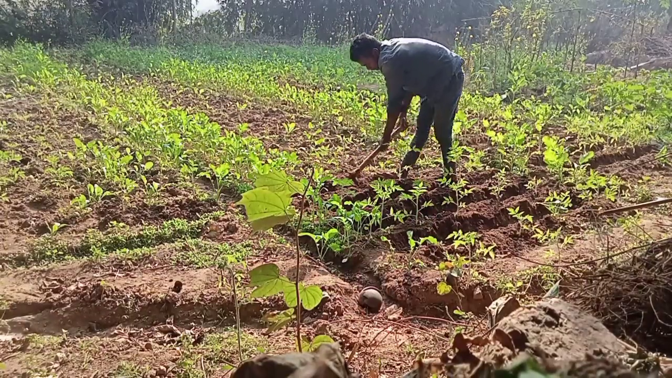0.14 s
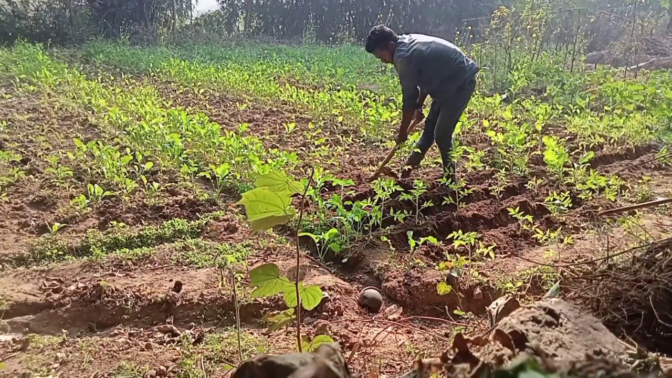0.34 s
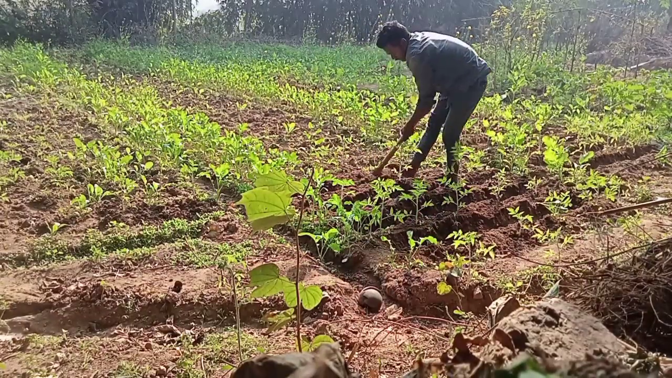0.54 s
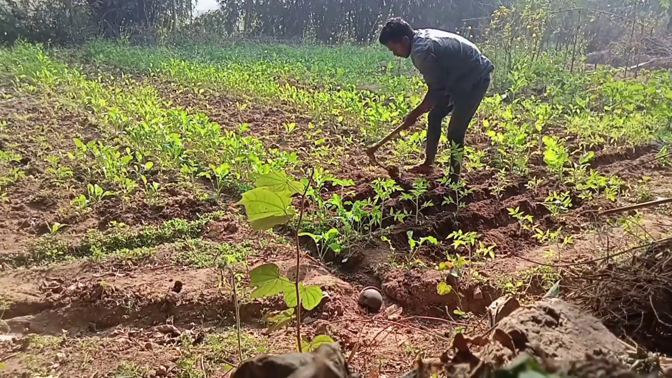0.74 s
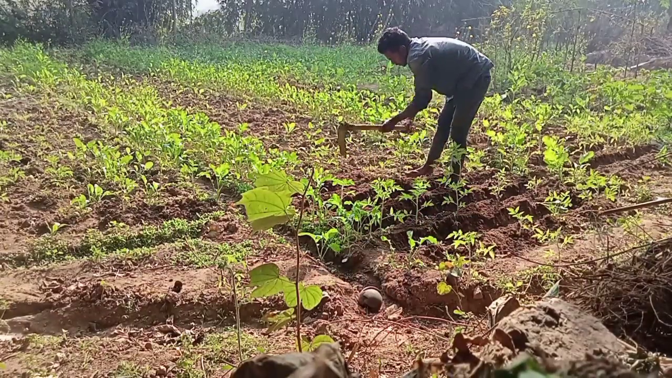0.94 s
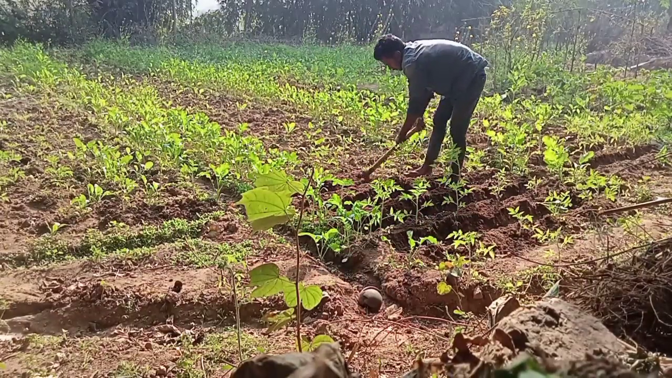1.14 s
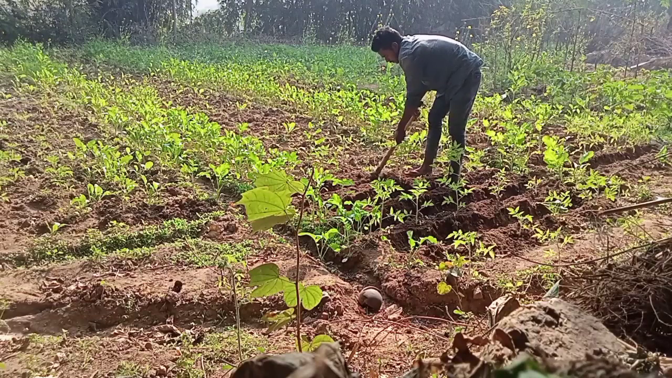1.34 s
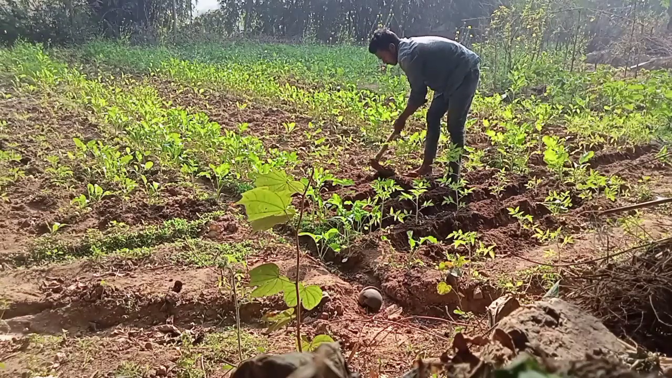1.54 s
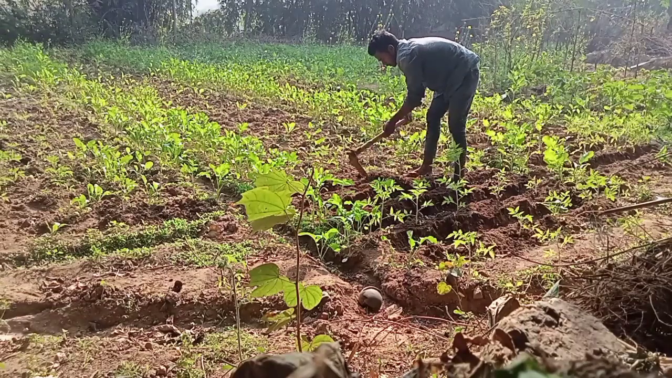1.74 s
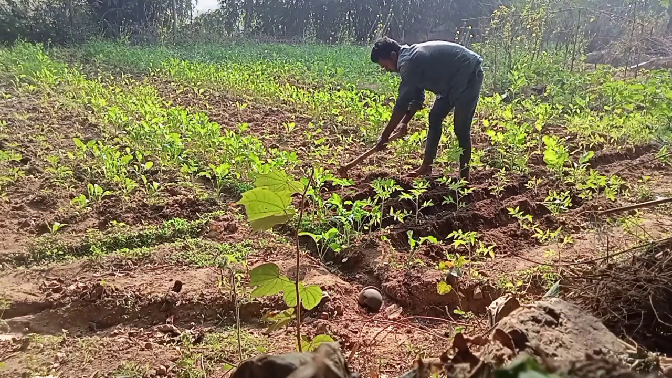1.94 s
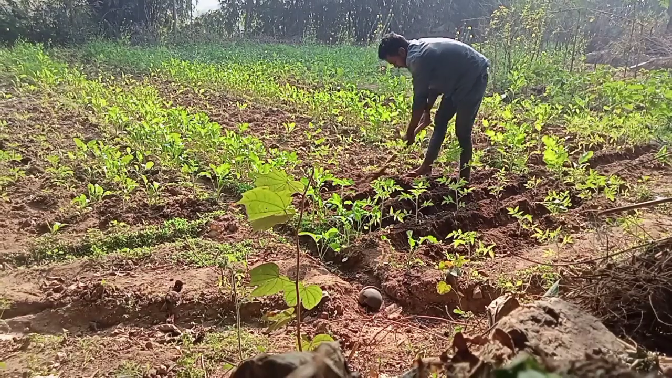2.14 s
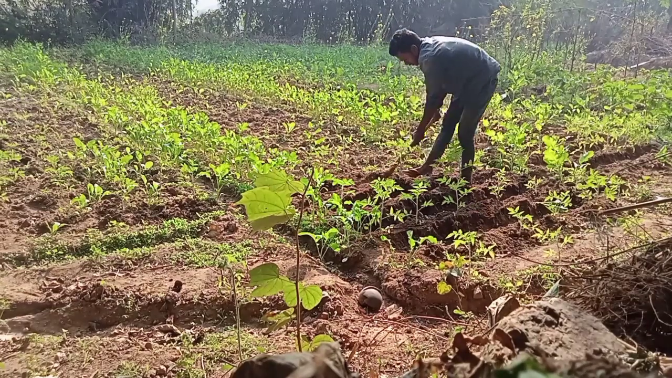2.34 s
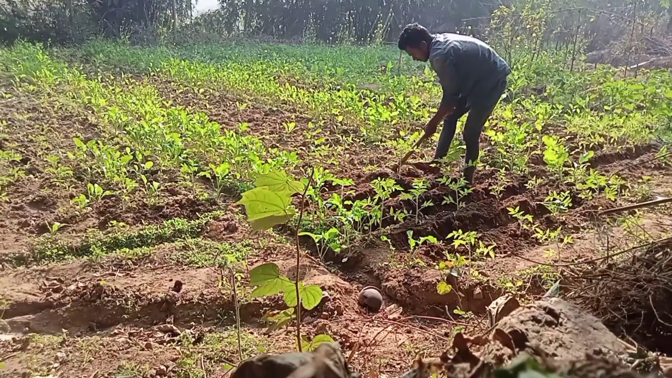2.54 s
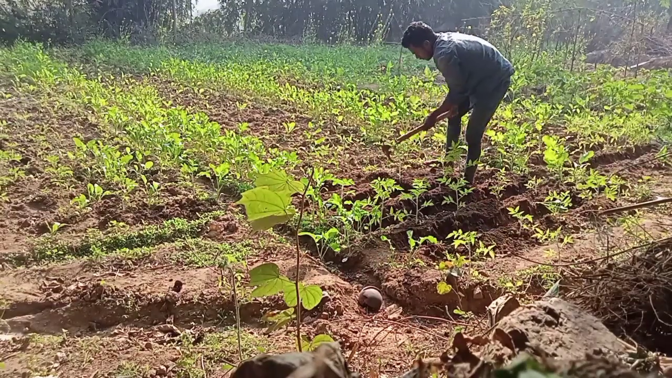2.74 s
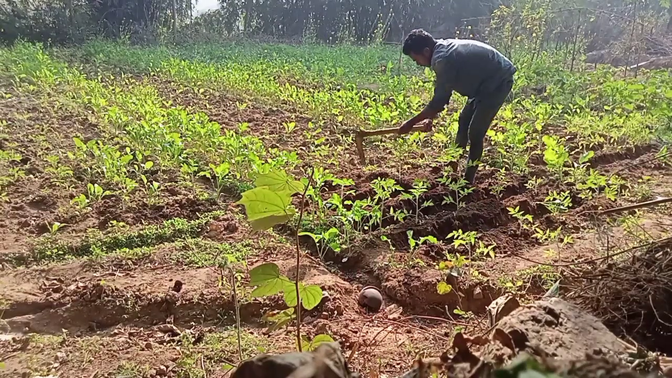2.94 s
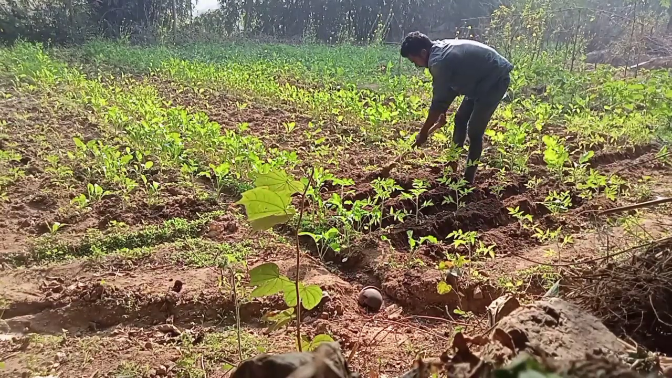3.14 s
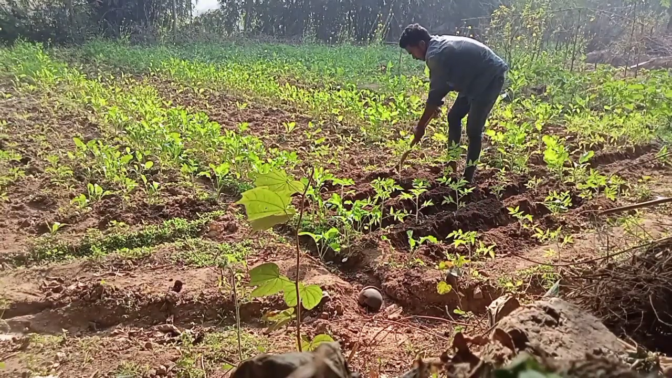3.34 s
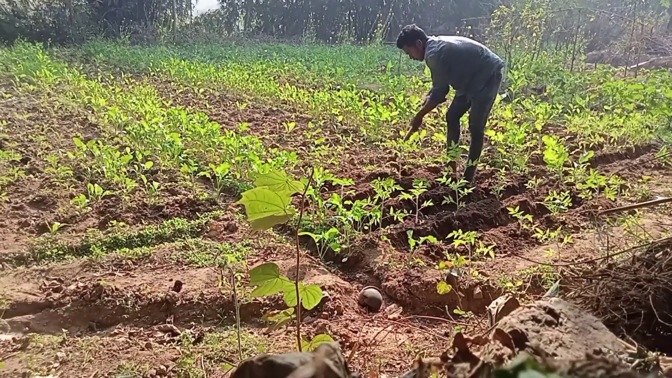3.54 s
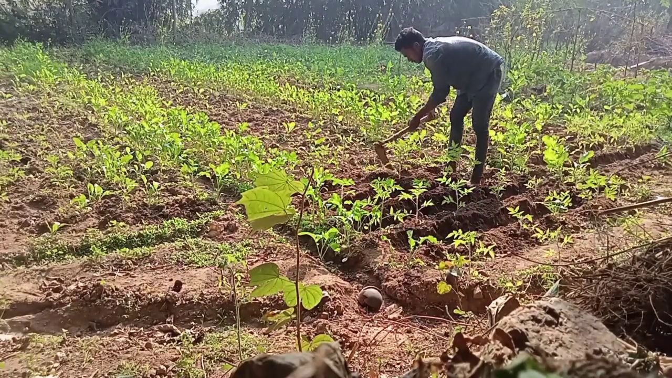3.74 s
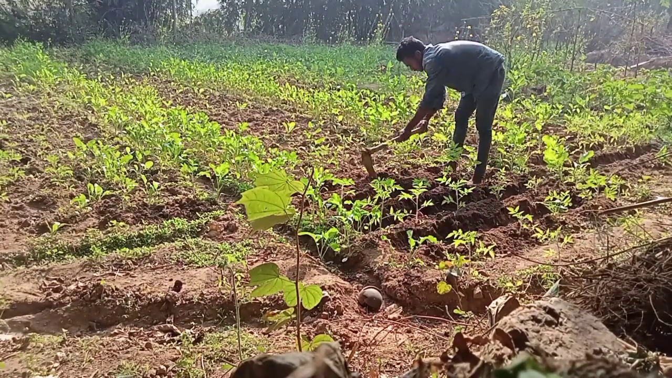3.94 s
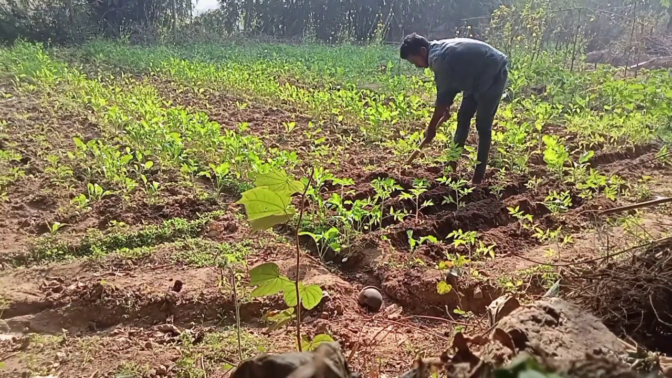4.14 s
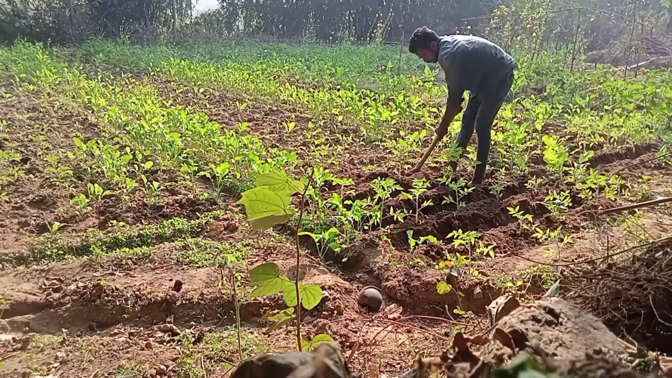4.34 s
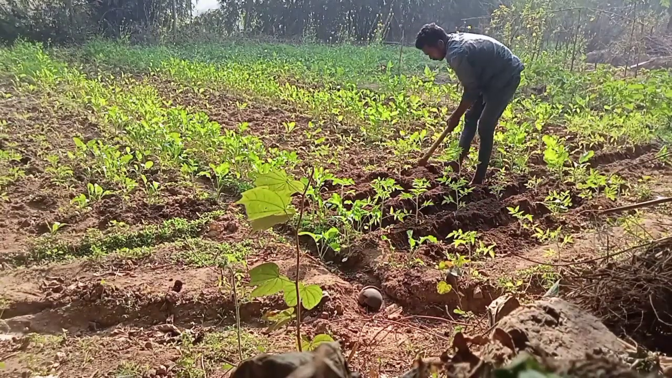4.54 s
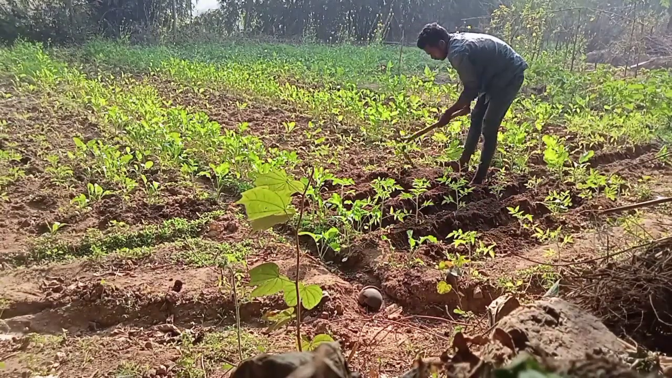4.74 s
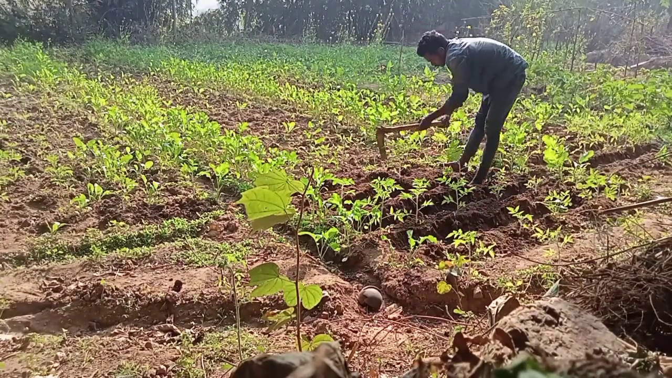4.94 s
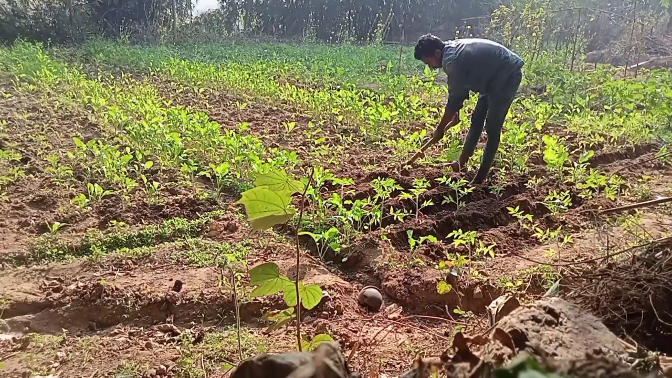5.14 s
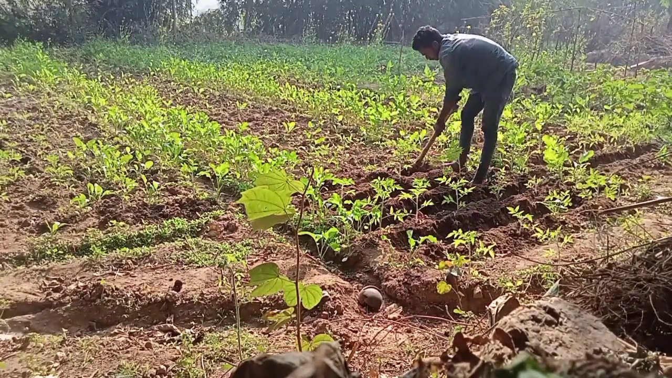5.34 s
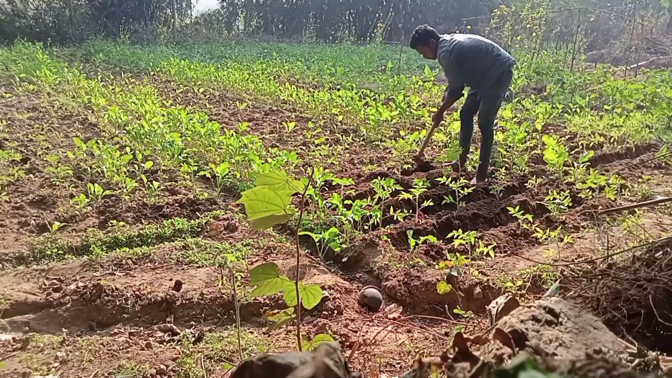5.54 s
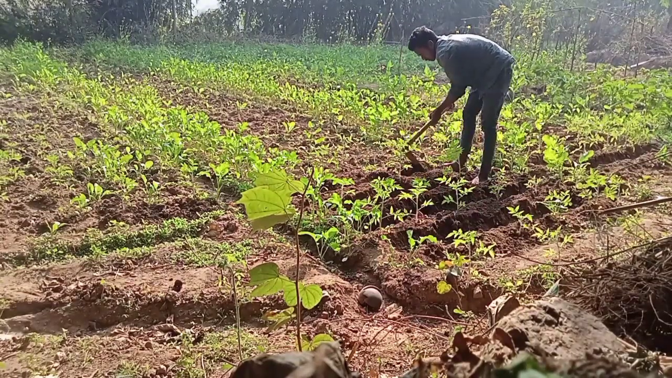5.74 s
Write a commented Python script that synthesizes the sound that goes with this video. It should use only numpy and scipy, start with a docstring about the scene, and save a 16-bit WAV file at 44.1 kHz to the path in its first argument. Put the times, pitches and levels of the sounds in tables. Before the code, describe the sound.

Six dull, gritty hoe strokes and crumbling earth in an open field, over distant bird whistles and soft cricket chirps.

```python
"""Hoeing a dry vegetable plot.

A short hoe chops the soil six times, a few metres from the microphone. Each bite thuds in the ground
while grit scratches and rings the steel blade; then earth crumbles off it. Crickets chirp farther off
and birds whistle in the trees round the field, over leaf hiss and a quiet distant rumble.
Near the end come three soft plips close by and a faint far hum."""
import sys
import numpy as np
from scipy import signal
from scipy.fft import rfft, irfft, next_fast_len
from scipy.io import wavfile
from scipy.ndimage import uniform_filter1d, map_coordinates

SR = 44100
rng = np.random.default_rng(int(sys.argv[2]) if len(sys.argv) > 2 else 0)


def wav_record(signal):
    """Record a signal, one row per channel, as 16-bit PCM in the file named by sys.argv[1]."""
    frames = np.transpose(np.atleast_2d(signal))
    bounded = np.clip(frames, -1, 1)
    # unit amplitude maps onto the largest positive 16-bit level
    quanta = np.round(bounded * 32767).astype(np.int16)
    wavfile.write(sys.argv[1], SR, quanta)


N = 259749

# hoe strokes: (deepest bite [s], plunge from touch to bite [s], rise [s], thud [dB], ground [Hz],
# knock [Hz], grit [dB], favoured blade ring [Hz], spilling earth [dB], spill t60 [s])
STROKES = [(.065, .02, 0.0025, -34, 149, 310.7, -50, 2600, -53.5, 0.81),
           (1.193, 0.023, 0.0095, -29, 169.2, 263.8, -39.5, 2650, -43.5, 0.37),
           (2.074, 0.03, 0.0019, -41, 148, 319, -46.5, 3270, -60, 0.41),
           (3.181, 0.034, 0.0072, -31.5, 125, 259.5, -41, 2400, -48.5, 0.44),
           (4.141, .044, 0.0026, -35.5, 137, 271, -39, 2550, -46.5, 0.64),
           (5.181, .011, .0062, -33, 127.3, 359, -37.5, 1720, -45.5, 0.47)]
LEAD_S = .05  # room for a contact force to build before its peak


def amp(db):
    """Decibels to gain."""
    return 10 ** (np.asarray(db) / 20)


def unit(x):
    """Scale to rms 1."""
    return x / np.sqrt(np.mean(x ** 2) + 1e-20)


def steady(x, window):
    """Hold the rms at 1 over runs of window samples."""
    return x / np.sqrt(np.abs(uniform_filter1d(x ** 2, size=window)) + 1e-12)


def along(points, hz):
    """Read (Hz, value) points on a log axis."""
    knots, values = np.transpose(points)
    return np.interp(np.log(hz + 1), np.log(knots + 1), values)


def filtered(x, response):
    """Shape x by a response given as a function of frequency."""
    size = next_fast_len(len(x) + SR // 4)
    return irfft(rfft(x, size) * response(np.fft.rfftfreq(size, 1 / SR)), size)[:len(x)]


def resonance(hz, centre, width):
    """Causal response of one mode."""
    return 1j * hz * width / (centre ** 2 - hz ** 2 + 1j * hz * width)


def wobble(size, rate):
    """A smooth random curve, rate knots a second."""
    knots = rng.standard_normal(int(size * rate / SR) + 4)
    return map_coordinates(knots, [np.arange(size) * rate / SR])


def add(track, s, x):
    """Mix x into track from time s on."""
    start = round(s * SR)
    x = x[max(-start, 0):]
    part = track[max(start, 0):][:len(x)]
    part += x[:len(part)]


def outdoors(air_db=-69.5, rumble_db=-65, hum_hz=650):
    """All round the microphone: leaf hiss, a restless distant rumble and a far hum that swells late."""
    # leaf hiss spectrum: (frequency [Hz], relative density [dB])
    air_spectrum = [(180, -40), (300, -4.5), (543, 2), (600, 2), (892, -0.5), (1350, -2), (1670, -2.5),
                    (1840, -1), (2210, -2), (3400, -6), (5050, -4.5), (5480, -17.5), (7750, -5),
                    (9760, -32.5), (15500, -25.5)]
    # distant rumble spectrum: (frequency [Hz], relative density [dB])
    rumble_spectrum = [(12, -54), (20, -21), (27, -14), (38, -40.5), (56, -4.5), (102, 0), (151, -7),
                       (182, -10.5), (312, -17), (500, -24.5), (650, -34), (1100, -120)]
    # swell of the far hum: (time [s], level [dB])
    hum_levels = [(0, -89), (4.9, -85), (5.2, -69), (5.55, -72), (5.65, -80), (5.8, -68), (5.89, -69)]
    noise = lambda response: unit(filtered(rng.standard_normal(N), response))
    air = amp(air_db + 2.8 * wobble(N, 2.81)) * noise(lambda hz: amp(along(air_spectrum, hz)))
    rumble = amp(rumble_db + .56 * wobble(N, 5.3)) * noise(lambda hz: amp(along(rumble_spectrum, hz)))
    swell = amp(np.interp(np.arange(N) / SR, *np.transpose(hum_levels)))
    hum = swell * noise(lambda hz: resonance(hz, hum_hz, width=150) ** 2)
    return air + rumble + hum


def grit(envelope, ring_hz, tilt_db_oct, ring_db=1, focus_db=8, spiky_db=4, soft_hz=8500):
    """Grains crack at random sizes; they sound by themselves and ring the blade."""
    # modes of the steel blade: (frequency [Hz], width [Hz], relative level [dB])
    blade_modes = [(1006, 86, -3), (1663, 72, 1), (1866, 187, 1), (2470, 200, -4), (2613, 65, 3),
                   (2960, 190, -12), (3530, 133, 0.5), (3750, 63, 2.5), (4080, 92, -8), (4920, 170, -8.5),
                   (5370, 40, -1), (7150, 280, -6.5)]
    # crushed soil spectrum: (frequency [Hz], relative density [dB])
    soil_spectrum = [(200, 1), (450, -21), (750, 9.5), (1300, 6.5), (2500, 13), (4000, 4), (5200, -7),
                     (6200, -1), (8300, 4), (9800, -8), (12500, -12), (15300, -7.5)]
    size = len(envelope)
    cracks = rng.standard_normal(size) * amp(spiky_db * wobble(size, 2500))

    def response(hz):
        modes = 0
        for centre, width, db in blade_modes:
            # the point of contact favours the modes near ring_hz
            favour_db = focus_db * np.exp(-(np.log(centre / ring_hz) / .22) ** 2) + rng.normal()
            modes += amp(db + favour_db) * resonance(hz, centre, width)
        steel = unit(modes / (1 + (hz / soft_hz) ** 10))  # the blade's ring fades steeply above soft_hz
        soil = unit(amp(along(soil_spectrum, hz)))
        tilt = amp(tilt_db_oct * np.log2(np.clip(hz, 600, 9000) / 2500))
        return unit(tilt * (soil + amp(ring_db) * steel))

    return filtered(envelope * steady(cracks, window=200), response)


def crumbs(flow, per_second=70, life_s=.00024):
    """Single crumbs drop out of a flow: brief peaks of random size."""
    falls = rng.random(len(flow)) < per_second / SR
    sizes = np.minimum(rng.exponential(size=len(flow)), 2)
    return flow * signal.lfilter([1], [1, -np.exp(-1 / (life_s * SR))], falls * sizes)


def loose_earth(spill_lead=.55, drag_t60_s=.44, rumble_hz=220, rumble_db=-3.3, crumb_db=2):
    """At every bite and drag, earth runs over the blade in clumps, patters down and trickles out."""
    # the blade drags through loose earth: (start [s], end [s], level [dB])
    drags = [(0, 0.05, -58.5), (.045, 0.288, -53), (2.061, 2.216, -54)]
    # earth already spills during the last spill_lead share of each plunge
    slides = [(s - spill_lead * plunge, s, db, t60) for s, plunge, *_, db, t60 in STROKES]
    slides += [(start, end, db, drag_t60_s) for start, end, db in drags]
    out, t = np.zeros(N), np.arange(3 * SR // 4) / SR
    low_band = lambda hz: resonance(hz, rumble_hz, width=1.73 * rumble_hz) ** 2
    for start, end, db, t60 in slides:
        trickle = amp(-60 * np.maximum(t - (end - start), 0) / t60)
        flow = (1 - np.exp(-t / .0012)) * trickle
        patter = filtered(rng.standard_normal(len(t)), low_band)
        rumble = flow * amp(4.4 * wobble(len(t), 68.5)) * steady(patter, window=700)
        clumps = amp(1.5 * wobble(len(t), 200))
        force = flow * clumps + amp(crumb_db) * crumbs(flow)
        scrape = grit(force, ring_hz=2650, tilt_db_oct=0, ring_db=-3.5, focus_db=4, spiky_db=1.5)
        add(out, start, amp(db) * (amp(rumble_db) * rumble + scrape))
    return out


def contact(rise_s, t60_s):
    """A contact force that peaks LEAD_S in: it builds while the soil yields, then dies."""
    t = np.arange(SR // 4) / SR - LEAD_S
    return np.where(t < 0, np.exp(-.5 * (t / rise_s) ** 2), 1e-3 ** (np.abs(t) / t60_s))


def thud(force, ground_hz=152, knock_hz=295, waver=.1504, knock_db=-1):
    """The ground heaves for a few uneven cycles while the hoe head knocks higher up."""
    def swing(hz):
        start_cycle = rng.random()
        pitch = hz * (1 + waver * wobble(len(force), 159.5))
        return np.sin(2 * np.pi * (start_cycle + np.cumsum(pitch) / SR))

    return force * (swing(ground_hz) + amp(knock_db) * swing(knock_hz))


def chops(touch_db=-50, touch_hz=2700, bite_t60_s=.062, tilt_db_oct=-.6):
    """Each stroke scratches through the crust, then bites with a thud as the soil stops the blade."""
    out = np.zeros(N)
    for s, plunge, rise, thud_db, ground_hz, knock_hz, grit_db, ring_hz, _, _ in STROKES:
        touch = grit(contact(rise_s=.0017, t60_s=.11), touch_hz, tilt_db_oct)
        add(out, s - plunge - LEAD_S, amp(touch_db) * touch)
        force = contact(rise, bite_t60_s)
        scratch = grit(force, ring_hz, tilt_db_oct)
        add(out, s - LEAD_S, amp(thud_db) * thud(force, ground_hz, knock_hz) + amp(grit_db) * scratch)
    return out


def stones(thud_db=-9):
    """A stone stops the edge at once: a sharp clink with little thud."""
    # steel meets stone: (time [s], level [dB], favoured blade ring [Hz])
    strikes = [(.091, -46, 2590), (.2697, -44, 2510), (2.185, -45.5, 3750), (4.1105, -30.5, 3400),
               (4.165, -40.5, 2090)]
    out, force = np.zeros(N), contact(rise_s=.00015, t60_s=.052)
    for s, db, ring_hz in strikes:
        clink = grit(force, ring_hz, tilt_db_oct=-.5)
        add(out, s - LEAD_S, amp(db) * (clink + amp(thud_db) * thud(force)))
    return out


def whistle(length, start_hz, middle_hz, end_hz, rasp):
    """One gliding tone; fast flutter of its pitch makes it raspy."""
    progress = np.linspace(0, 1, max(int(length * SR), 64))
    glide = np.polyval(np.polyfit([0, .5, 1], [start_hz, middle_hz, end_hz], 2), progress)
    pitch = glide * (1 + .061 * rasp * wobble(len(progress), 600))
    envelope = np.abs(np.sin(np.pi * progress)) ** .29
    return np.sqrt(2) * envelope * np.sin(2 * np.pi * np.cumsum(pitch) / SR)


def crickets(stroke_spacing_s=.051):
    """Crickets out in the grass: each chirp is two wing strokes at the wing's own pitch."""
    # runs of chirps: (start [s], end [s], period [s], stroke length [s], pitch [Hz], source level [dB])
    runs = [(.108, 1.6, .2, .036, 5690, -67), (1.752, 2.65, .199, .03, 5720, -65),
            (1.44, 5.7, .209, .05, 5330, -71.5), (.237, 3.0, .196, .04, 5540, -73),
            (3.14, 5.7, .208, .04, 5540, -77), (4.22, 5.7, .197, .045, 6120, -77.5)]
    out = np.zeros(N)
    for start, end, period, length, wing_hz, db in runs:
        chirp_times = np.arange(start, end, period)
        for s in (chirp_times[:, None] + [0, stroke_spacing_s]).ravel():
            hz = wing_hz * (1 + .0044 * rng.normal())
            stroke = whistle(length, hz - 20, hz + 15, hz - 40, rasp=.13)
            add(out, s, amp(db + rng.normal()) * stroke)
    return out


def clods():
    """Lumps tumble off the blade and land with a dull pat."""
    # clods hit the ground: (time [s], thud [dB], grit [dB])
    landings = [(.133, -41.5, -50), (.196, -40.5, -65), (.249, -40, -62), (.287, -43, -51.5),
                (.51, -57.5, -66), (1.252, -42, -48), (2.193, -35.5, -51.5), (2.559, -64.5, -63),
                (3.275, -42.5, -49.5), (4.211, -47, -48), (4.282, -47.5, -57), (4.69, -57.5, -80),
                (5.234, -47, -68), (5.279, -69, -56)]
    out, force = np.zeros(N), contact(rise_s=.0032, t60_s=.045)
    for s, thud_db, grit_db in landings:
        scratch = grit(force, ring_hz=2620, tilt_db_oct=-5, ring_db=0, focus_db=7)
        add(out, s - LEAD_S, amp(thud_db) * thud(force) + amp(grit_db) * scratch)
    return out


def birds(slur_sag=.015, chip_s=.06, seesaw_note_s=.1, flutter_db=3):
    """Birds in the far trees: each kind of call has one shape, and all flutter in strength."""
    # falling whistles: (time [s], length [s], start [Hz], end [Hz], source level [dB])
    slurs = [(0.541, .16, 3920, 3100, -57.5), (0.688, .24, 3130, 2746, -65), (4.291, .27, 4230, 3240, -65),
             (5.733, 0.13, 4050, 3680, -59.5)]
    # high raspy chips: (time [s], start [Hz], end [Hz], source level [dB])
    chips = [(0.934, 5880, 6340, -64.5), (1.528, 6050, 6270, -65), (2.287, 6170, 6370, -62),
             (2.826, 6500, 6100, -58), (3.561, 5850, 6840, -61), (3.59, 6900, 7850, -61.5),
             (4.035, 6050, 6530, -62)]
    # hoarse calls: (time [s], length [s], pitch [Hz], source level [dB])
    caws = [(.713, 0.057, 2060, -65), (2.745, 0.22, 1900, -67.5), (3.829, .22, 2370, -66)]
    # two-note calls, up then down: (time [s], delay of second note [s], source level [dB])
    seesaws = [(1.344, .184, -70), (1.74, .123, -68)]
    up_hz, down_hz = (3200, 3880, 4340), (3750, 3030, 2750)
    notes = []
    for s, length, start_hz, end_hz, db in slurs:
        middle_hz = (1 - slur_sag) * (start_hz + end_hz) / 2
        notes.append((s, amp(db) * whistle(length, start_hz, middle_hz, end_hz, rasp=.27)))
    for s, start_hz, end_hz, db in chips:
        middle_hz = (start_hz + end_hz) / 2
        notes.append((s, amp(db) * whistle(chip_s, start_hz, middle_hz, end_hz, rasp=.58)))
    for s, length, hz, db in caws:
        notes.append((s, amp(db) * whistle(length, hz, hz, hz, rasp=1.305)))
    for s, delay, db in seesaws:
        notes.append((s, amp(db) * whistle(seesaw_note_s, *up_hz, rasp=.37)))
        notes.append((s + delay, amp(db) * whistle(seesaw_note_s, *down_hz, rasp=.37)))
    notes.append(upsweep())
    out = np.zeros(N)
    for s, note in notes:
        add(out, s, amp(flutter_db * wobble(len(note), 121)) * note)
    return out


def plips(plip_hz=1000, waver_hz=125.4, swell_s=.0017):
    """Soft hollow blips near the microphone, a few cycles long."""
    # close plips: (time [s], peak level [dB])
    blips = [(5.495, -56), (5.696, -48), (5.808, -44)]
    out, t = np.zeros(N), np.arange(-SR // 50, SR // 50) / SR
    envelope = np.exp(-.5 * (t / swell_s) ** 2)
    for s, db in blips:
        phase = 2 * np.pi * np.cumsum(plip_hz + waver_hz * wobble(len(t), 511)) / SR
        add(out, s + t[0], amp(db) * envelope * np.sin(phase))
    return out


def upsweep():
    """One bird's whistle climbs and frays at the top; gives its start time and its sound."""
    # course of the whistle: (time [s], pitch [Hz], source level [dB], rasp [0-1])
    course = [(5.676, 4040, -58, .05), (5.7, 4730, -52.5, 0), (5.776, 5600, -53, 0.22),
              (5.805, 6450, -56, .5), (5.855, 7000, -66, .8)]
    times, *columns = np.transpose(course)
    t = np.arange(times[0], times[-1], 1 / SR)
    hz, db, rasp = (np.interp(t, times, column) for column in columns)
    pitch = hz * (1 + .054 * rasp * wobble(len(t), 600))
    return times[0], np.sqrt(2) * amp(db) * np.sin(2 * np.pi * np.cumsum(pitch) / SR)


def field_echo(x):
    """Trees and banks scatter a thin echo back to the microphone, 10 ms behind the direct sound."""
    # decay of the open field: (frequency [Hz], t60 [s])
    decay_times = [(150, 0.57), (2500, 0.26), (9000, 0.21)]
    hz, t, spectra = signal.stft(rng.standard_normal(SR // 2), SR, nperseg=256)
    decay = amp(-60 * t / along(decay_times, hz)[:, None])
    _, tail = signal.istft(spectra * decay, SR, nperseg=256)
    impulse = np.pad(tail / np.linalg.norm(tail), (SR // 100, 0))
    return signal.fftconvolve(x, impulse)[:N]


def scene():
    """One microphone on the plot: the hoe near and dry, crickets farther off, birds far and wet."""
    # the hoe's sounds thin out below about 72 Hz
    bass_cut = signal.butter(3, 72, "high", fs=SR, output="sos")
    hoe = signal.sosfilt(bass_cut, chops() + stones() + clods() + loose_earth())
    song, chirping = birds(), crickets()
    near = hoe + amp(-18) * field_echo(hoe)
    trees = amp(-9) * song + amp(-8.5) * field_echo(song)
    grass = amp(-4) * (chirping + amp(-12) * field_echo(chirping))
    return (near + trees + grass + plips() + outdoors())[None]


def record(dry):
    """The recorder keeps nothing above its band limit."""
    top_hz = 15600
    return np.array([filtered(channel, lambda hz: hz < top_hz) for channel in dry])


dry = scene()
out = record(dry)
wav_record(out)
```